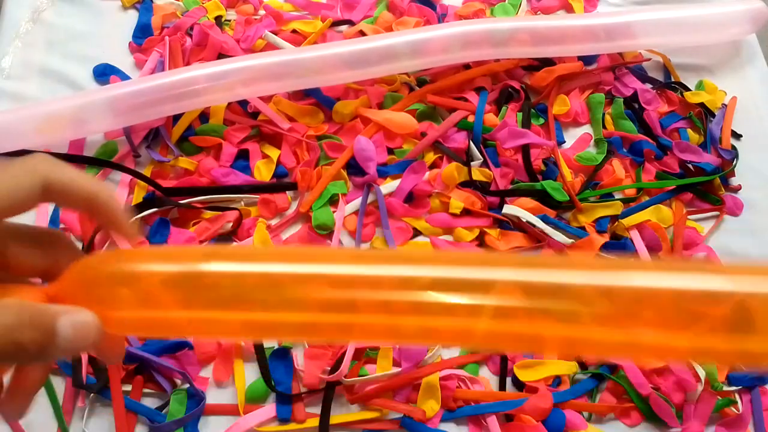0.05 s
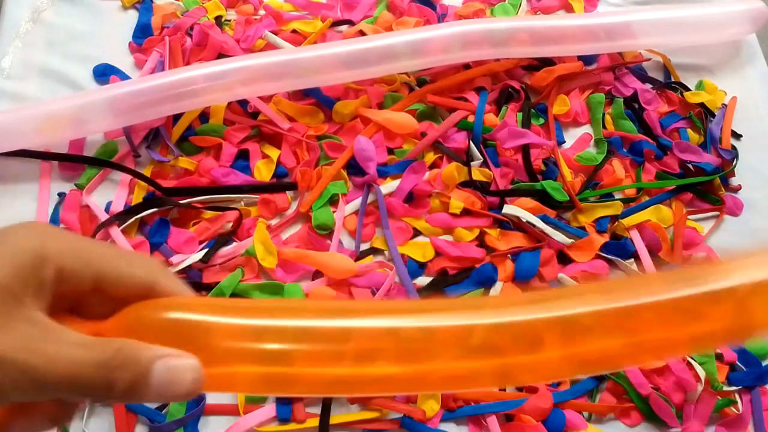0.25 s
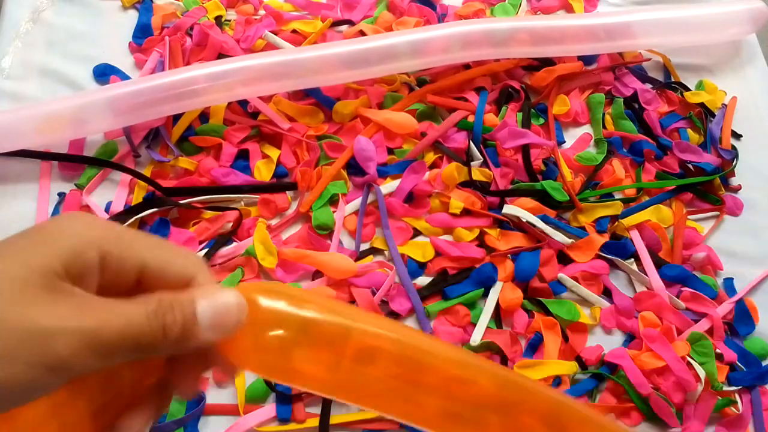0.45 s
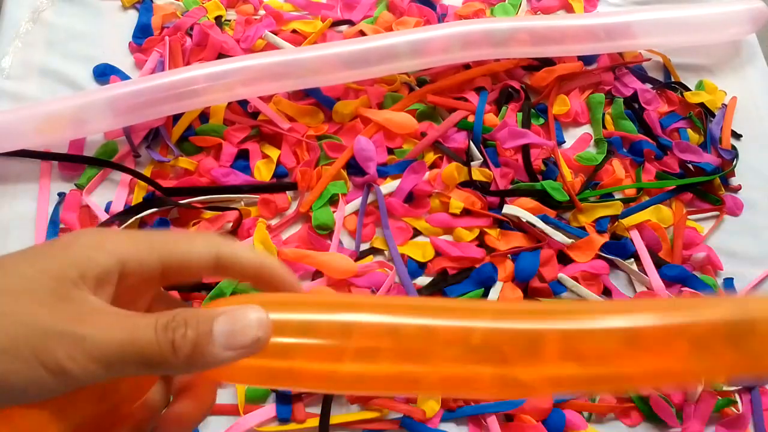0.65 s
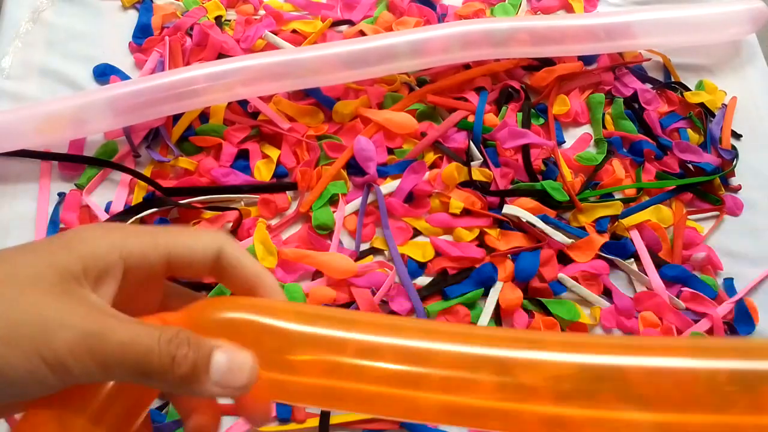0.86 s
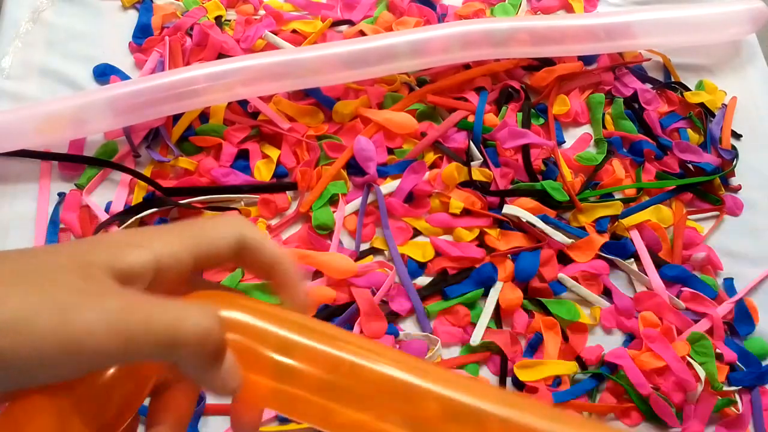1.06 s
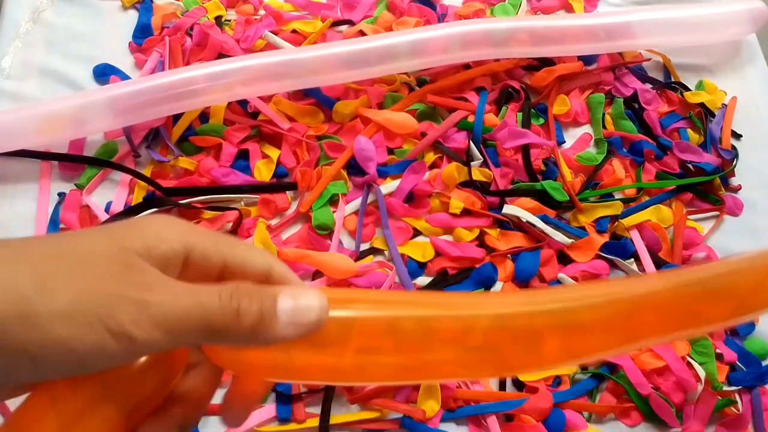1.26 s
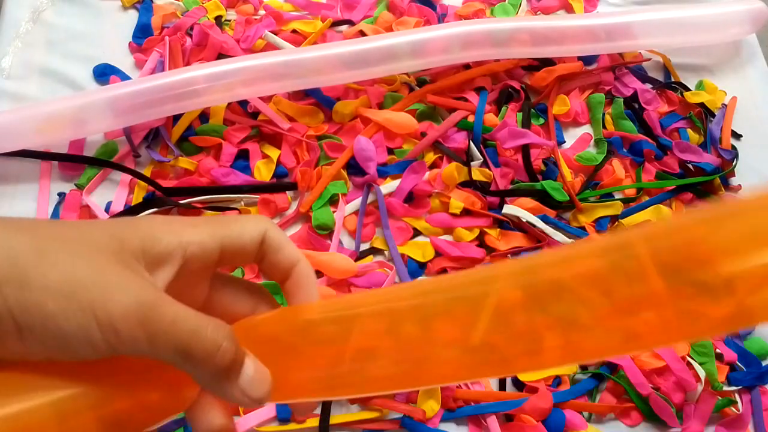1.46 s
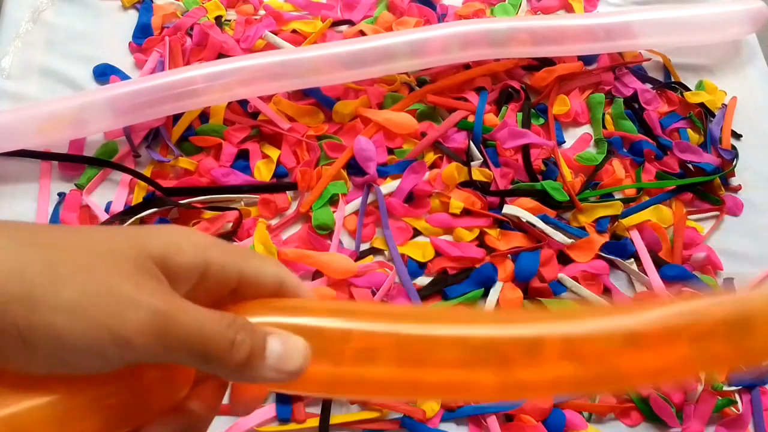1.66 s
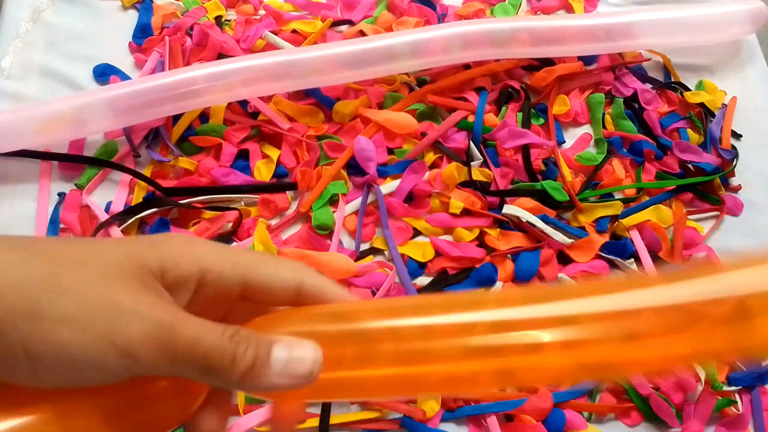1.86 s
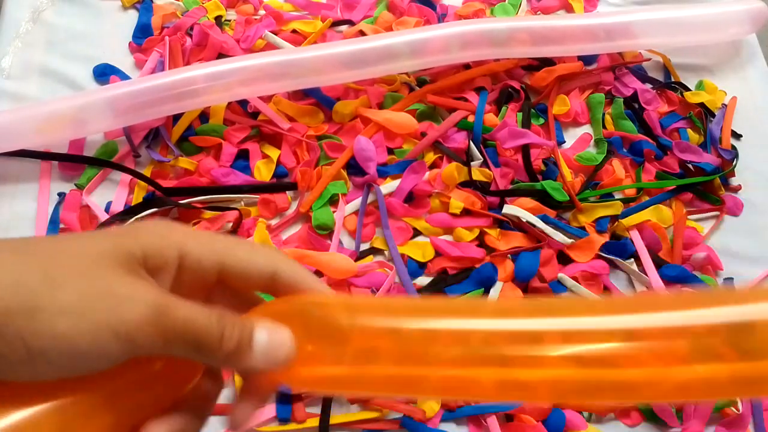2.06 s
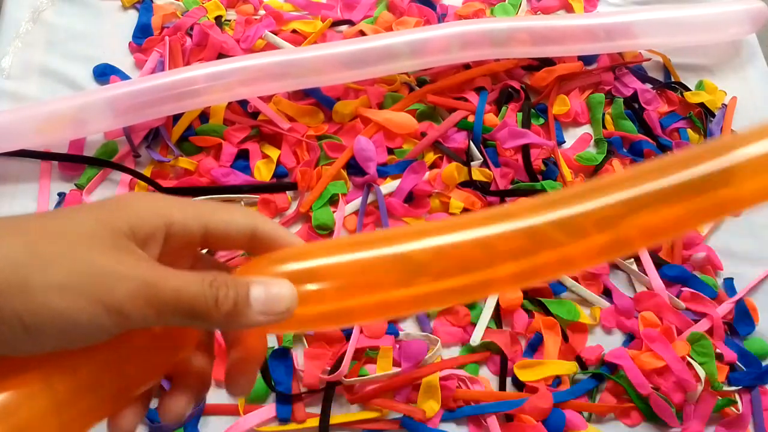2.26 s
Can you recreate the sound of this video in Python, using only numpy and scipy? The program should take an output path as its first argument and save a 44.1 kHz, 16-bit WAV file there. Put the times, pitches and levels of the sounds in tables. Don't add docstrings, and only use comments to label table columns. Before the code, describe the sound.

Fingers rub a long inflated balloon, giving shrill swooping squeals, scratchy creaks and dry snapping clicks.

```python
import sys
import numpy as np
from scipy import signal
from scipy.fft import rfft, irfft, next_fast_len
from scipy.io import wavfile
from scipy.ndimage import uniform_filter1d

SR = 44100
rng = np.random.default_rng(int(sys.argv[2]) if len(sys.argv) > 2 else 0)


def dump_mix(stems):
    frames = np.atleast_2d(stems).T
    limited = np.clip(frames, -1, 1)
    pcm = np.round(limited * 32767).astype(np.int16)
    wavfile.write(sys.argv[1], SR, pcm)


def rack_gain(trim_db):
    fader = np.asarray(trim_db, float)
    return 10 ** (fader / 20)


N = 101429


def curve(points, hz):
    p = np.array(points)
    return np.interp(np.log(hz + 1), np.log(p[:, 0]), p[:, 1])


def colour(x, points):
    size = 4096
    half = size // 2
    response = rack_gain(curve(points, np.arange(half + 1) * SR / size))
    cepstrum = irfft(np.log(response))
    cepstrum[1:half] *= 2
    cepstrum[half + 1:] = 0
    impulse = irfft(np.exp(rfft(cepstrum)))[:half]
    return signal.fftconvolve(x, impulse)[:N]


def highpass(x, order, hz):
    return signal.sosfilt(signal.butter(order, hz, "high", fs=SR, output="sos"), x)


def drift(rate):
    settle = 4000
    r = np.exp(-2 * np.pi * rate / SR)
    x = signal.lfilter([1], [1, -2 * r, r * r], rng.standard_normal(N + settle))[settle:]
    return x / x.std()


def window(start, length, attack, release):
    t = np.arange(N) / SR - start
    return np.clip(t / attack, 0, 1) * np.exp(-np.clip(t - length, 0, None) / release)


# frequency in Hz, level in dB.
FLOOR = [(25, -26.5), (150, -45), (600, -26.5), (1600, -27.5), (3800, -21), (5500, -25.5), (7000, -42),
         (15500, -43)]
FLOOR_DB, HUSH_DUCK = -67.5, 14


def hush(squeals):
    noise = colour(rng.standard_normal(N), FLOOR)
    loudness = uniform_filter1d(np.abs(squeals), size=2000)
    return rack_gain(FLOOR_DB) * noise / noise.std() / (1 + HUSH_DUCK * loudness)


def rumble():
    x = signal.lfilter(*signal.iirpeak(100, 100 / 20, SR), rng.standard_normal(N))
    return rack_gain(-95) * x / x.std()


# start in seconds, length in seconds, slips per second, level in dB, skin level in dB.
TOUCHES = [
    (.001, 0.065, 2500, -29, -15),
    (.0432, 0.014, 6000, -23, 12.5),
    (.085, 0.016, 1500, -19.5, 4.5),
    (.124, 0.0041, 3200, -22.5, -27),
    (.14, 0.0096, 960, -18, 10.5),
    (.178, 0.016, 2800, -24.5, 12.5),
    (.23, 0.082, 1800, -19.5, 8),
]
# start in seconds, length in seconds, slips per second, level in dB, skin level in dB.
RUBS = [(.28, 0.038, 1500, -20.5, -11), (.445, .015, 1800, -21.5, -4.5), (.456, 0.048, 4200, -23.5, -0.5),
        (0.496, 0.08, 400, -26.5, 3.5), (0.62, 0.011, 2300, -31, 7), (.642, 0.015, 2800, -23.5, 3.5),
        (.78, 0.034, 1200, -16, -3.5), (.994, 0.037, 4100, -19, 0.5), (1.028, 0.033, 1500, -18, -2.5),
        (1.06, 0.045, 1800, -30, 7.5), (1.111, 0.011, 1400, -15, 6), (1.124, 0.069, 1000, -29.5, -15.5),
        (1.303, 0.0081, 4800, -25, -1), (1.335, 0.035, 2100, -19.5, -0.5), (1.387, 0.025, 2300, -28, 2.5),
        (1.429, 0.056, 11000, -30.5, 6), (1.462, 0.04, 4900, -20, -11), (1.509, 0.04, 5600, -24.5, -0.5),
        (1.56, 0.05, 2400, -36.5, 13), (1.755, 0.11, 1100, -20.5, -6.5), (1.922, 0.0093, 2100, -21, -12.5),
        (1.937, 0.005, 2500, -24.5, 11.5), (1.974, 0.054, 4000, -37.5, 16.5), (2.03, 0.026, 3000, -24, -9),
        (2.212, 0.024, 1300, -24, -4.5)]
# frequency in Hz, level in dB.
TOUCH = [(1500, -34), (2600, -24), (3100, 4), (3420, -6.5), (3750, 7), (4300, -13.5), (4800, -41),
         (16000, -58)]
# frequency in Hz, level in dB.
TOUCH_SKIN = [(200, -60.5), (280, -42.5), (600, -51), (1050, -24.5), (1500, -46), (2100, -18),
              (2500, -43.5), (4000, -76)]
# frequency in Hz, level in dB.
SLIP = [(1200, -27), (2000, -31), (2800, -10.5), (3800, 6.5), (5200, -7), (5900, -16.5), (6800, -48.5),
        (16000, -62)]
# frequency in Hz, level in dB.
SKIN = [(200, -48.5), (450, -12), (750, -13), (1000, -8), (1350, -11), (2300, -1), (3300, -1.5),
        (6000, -90)]
SLIP_SPREAD_DB, RUB_LUMPS_DB = 5.5, 2.5
RUB_ATTACK_S, RUB_RELEASE_S = 0.002, 0.0054
SKIN_SHARE = 0.14


def rubs(table, contact, body):
    sharp, skin = np.zeros(N), np.zeros(N)
    chance = rng.random((2, N))
    lumps = rack_gain(RUB_LUMPS_DB * np.array([drift(85), drift(53)]))
    excess = np.minimum(rng.exponential(1, (2, N)), 2.5)
    sizes = rack_gain(SLIP_SPREAD_DB * excess) * rng.choice([-1, 1], (2, N)) * lumps
    for start, length, rate, db, skin_db in table:
        envelope = rack_gain(db) * window(start, length, RUB_ATTACK_S, RUB_RELEASE_S)
        rub = sizes * (chance < rate / SR) * envelope
        sharp += rub[0]
        skin += (SKIN_SHARE * rub[0] + rub[1]) * rack_gain(skin_db)
    return colour(sharp, contact) + colour(skin, body)


# frequency in Hz, level in dB.
AIR = [(5500, -99.5), (6300, -29.5), (8000, -40.5), (12000, -47), (16000, -45)]
# start in seconds, length in seconds, extra gain.
WIPE = (1.428, .068, 2.5)


def friction_hiss(contact):
    strength = uniform_filter1d(np.abs(contact), size=40)
    hiss = colour(strength * rng.standard_normal(N), AIR)
    start, length, extra = WIPE
    return hiss * (1 + extra * window(start, length, .005, .01))


EARLY_T60_S, EARLY_DB = 0.07, -9.5
ROOM_T60_S, ROOM_DB = 0.35, -5.5


def room(x):
    t = np.arange(SR // 2) / SR
    tail = 0
    for t60, db in ((EARLY_T60_S, EARLY_DB), (ROOM_T60_S, ROOM_DB)):
        part = rng.standard_normal(len(t)) * rack_gain(-60 * t / t60) * (t > .001)
        tail = tail + rack_gain(db) * part / np.sqrt(np.sum(part ** 2))
    return signal.fftconvolve(x, tail)[:N]


# time in seconds, frequency in Hz.
TAUT = [(0, 4550), (.235, 4850), (.27, 6200), (.5, 5900), (.6, 5560), (.645, 6370), (.93, 6040),
        (1.2, 5470), (1.3, 4970), (1.5, 5100), (1.6, 5940), (1.68, 4930), (1.72, 4580), (1.76, 4880),
        (1.83, 6600), (2.05, 6000), (2.15, 4900), (2.3, 4670)]
# centre in Hz, width in Hz, depth from 0 to 1.
HOLLOWS = [
    (850, 150, .7),
    (1407, 300, 1),
]
EDGE_HZ, LEAK_DB = 200, -37
REGRIP_S = 1.0


def taut(x):
    size = 2 * next_fast_len(N // 2 + SR // 20)
    t = np.arange(N) / SR
    hz = np.arange(size // 2 + 1) * SR / size
    spectrum = rfft(x, size)
    edge = np.interp(t, *np.transpose(TAUT))
    out, below = 0, 0
    for top in np.append(np.arange(4200, 7000, 200), 2 * SR):
        lowpass = 1 / (1 + np.exp(np.clip((hz - top) / 60, -50, 50)))
        upto = irfft(spectrum * lowpass)[:N]
        carried = 1 / (1 + np.exp(np.clip((top - edge) / EDGE_HZ, -50, 50)))
        out = out + (upto - below) * (rack_gain(LEAK_DB) + carried)
        below = upto
    first_grip = np.clip((REGRIP_S - t) / 0.019, 0, 1)
    for centre_hz, width_hz, depth in HOLLOWS:
        peak = signal.lfilter(*signal.iirpeak(centre_hz, centre_hz / width_hz, SR), out)
        out = out - depth * first_grip * peak
    return out


# time in seconds, peak level in dB.
SNAPS = [(0.087, -22), (1.3567, -14), (1.3672, -21), (1.371, -20), (1.3954, -23), (1.4004, -22),
         (1.4082, -28), (1.5157, -19), (1.532, -15), (1.5419, -21), (1.5507, -21), (1.5641, -13),
         (1.5736, -23), (1.5758, -10), (1.5856, -8), (1.5929, -22), (1.6015, -9), (1.6158, -25),
         (1.6361, -28), (1.6629, -30), (1.6797, -25), (1.7025, -30), (1.7136, -29), (1.7154, -40),
         (1.7258, -22), (1.7285, -27), (1.7351, -17), (1.7373, -18), (1.7419, -17), (1.7443, -16),
         (1.7489, -15), (1.7509, -15), (1.7711, -24), (2.1838, -37), (2.1871, -36), (2.1898, -34),
         (2.1927, -38), (2.1965, -36), (2.204, -40), (2.2123, -35), (2.2142, -26), (2.2224, -28),
         (2.2258, -28), (2.2295, -27), (2.2412, -30), (2.2445, -34), (2.2472, -28), (2.2558, -24),
         (2.2581, -32)]
# time in seconds, peak level in dB.
TICKS = [(0.6441, -14), (0.9047, -12), (0.9466, -19), (0.9535, -22), (0.9583, -16), (0.9604, -24),
         (0.966, -15), (0.9719, -17), (0.9771, -13), (0.9801, -14), (0.9823, -17), (0.9849, -15),
         (0.9871, -16), (0.9895, -16), (0.9917, -16), (0.9934, -15), (1.0557, -14), (1.0593, -16),
         (1.0623, -15), (1.0663, -16), (1.0681, -15), (1.0708, -17), (1.0743, -15), (1.0783, -18),
         (1.0822, -17), (1.0861, -16), (1.0897, -16), (1.1005, -22), (1.1055, -22), (1.114, -17),
         (1.1178, -14), (1.1203, -16), (1.1223, -14), (1.1283, -20), (1.1533, -14), (1.1569, -12),
         (1.1606, -11), (1.164, -12), (1.1666, -12), (1.1697, -12), (1.1728, -13), (1.1757, -17),
         (1.1783, -19), (1.1811, -23)]
# start in seconds, number of slips, first gap in seconds, gap ratio per slip, level in dB.
CREAKS = [
    (1.0327, 10, 0.0026, 1, -15),
]
# time in seconds, level in dB.
GRIP = [(0.95, -7.5), (1.001, -5.5), (1.101, -11.5), (1.55, -7), (1.62, -15), (1.691, 4), (1.76, 3),
        (2.2, -3)]
SNAP_DB, CREAK_DB = 19, 18.5
CREAK_JITTER, CREAK_SPREAD_DB = .06, 2.2
DULLING = .2
CLICK_RING_S, CLICK_RING_DB = .007, -10


def slips():
    clicks = np.zeros(N)
    for start, count, gap, change, db in CREAKS:
        k = np.arange(count)
        timing, strength = rng.standard_normal((2, count))
        gaps = gap * change ** k * (1 + CREAK_JITTER * timing)
        s = start + np.cumsum(gaps) - gap
        clicks[(s * SR).astype(int)] += rack_gain(db + CREAK_DB + CREAK_SPREAD_DB * strength)
    for s, db in list(TICKS) + list(SNAPS):
        clicks[int((s - .0004) * SR)] += rack_gain(db + SNAP_DB)
    grip_db = np.interp(np.arange(N) / SR, *np.transpose(GRIP))
    sharp = colour(clicks * rack_gain(DULLING * (grip_db.min() - grip_db)), SLIP)
    skin = colour(clicks * rack_gain(grip_db), SKIN)
    t = np.arange(SR // 20) / SR
    ring = rng.standard_normal(len(t)) * rack_gain(-60 * t / CLICK_RING_S)
    ring = rack_gain(CLICK_RING_DB) * ring / np.sqrt(np.sum(ring ** 2))
    ring[0] = 1
    return highpass(signal.fftconvolve(sharp + skin, ring)[:N], 2, 700)


# time in seconds, pitch in Hz, level in dB.
SQUEALS = [
    [(.234, 3707, -28), (.258, 4093, -33.5), (.275, 5830, -32.5), (.292, 3496, -25), (.318, 4530, -34.5),
     (.342, 3492, -27), (.37, 5212, -25.5), (.393, 3500, -25.5), (.405, 5150, -38)],
    [(.41, 5525, -55.5), (.45, 4890, -31.5)],
    [(.597, 3690, -42), (.628, 3915, -27), (.645, 5816, -27.5), (.668, 4700, -16.5), (.687, 3508, -30.5),
     (.72, 3568, -27.5), (.752, 5496, -16), (.768, 3613, -25), (.79, 3295, -43)],
    [(.795, 3534, -35), (.82, 3685, -25), (.842, 5383, -23), (.86, 3645, -36.5), (.885, 4725, -44),
     (.925, 3974, -43)],
    [(1.792, 3631, -31), (1.807, 3800, -25), (1.828, 6150, -43), (1.852, 4870, -18.5), (1.87, 3597, -31.5),
     (1.908, 3330, -32), (1.925, 4933, -16), (1.942, 5334, -29), (1.958, 3530, -26)],
    [(1.96, 3622, -25), (1.975, 5290, -36.5), (1.995, 3645, -41.5), (2.015, 5220, -44.5),
     (2.045, 3700, -48.5)],
]
# time in seconds, pitch in Hz, level in dB.
TURN = [
    (.458, 3900, -10.5),
    (.48, 2720, -30.5),
    (.494, 4090, -48.5),
]
# frequency in Hz, level in dB.
MIC = [(1500, -24), (2500, -3), (3700, -2), (4200, -5.5), (5000, -12), (5700, -16), (6400, -13)]
# frequency in Hz, level in dB.
GRIT = [(250, -38), (600, -10), (1100, -14.5), (1450, -92.5), (2300, -31.5), (3000, -39.5), (6500, -69)]
WOBBLE_HZ, WOBBLE_RATE_HZ = 60, 300
FLUTTER_DB, FLUTTER_RATE_HZ = 3, 400
SQUEAL_EDGE_S, SQUEAL_GRIT_DB = 0.008, -18
SECOND_FINGER_S, SECOND_FINGER_DB, SECOND_FINGER_PITCH = .023, -3, 1.04


def squeal(strokes):
    out, grit_gain = np.zeros(N), np.zeros(N)
    fingers = ((0, 0, 1), (SECOND_FINGER_S, SECOND_FINGER_DB, SECOND_FINGER_PITCH))
    for lag, finger_db, pitch in fingers:
        t = np.arange(N) / SR - lag
        wobble = 2 * WOBBLE_HZ * np.tanh(.5 * drift(WOBBLE_RATE_HZ))
        flutter = rack_gain(finger_db + 2 * FLUTTER_DB * np.tanh(.5 * drift(FLUTTER_RATE_HZ)))
        for rows in strokes:
            s, hz, db = np.transpose(rows)
            glide = uniform_filter1d(np.interp(t, s, pitch * hz), size=250)
            phase = 2 * np.pi * np.cumsum(glide + wobble) / SR
            envelope = window(s[0] + lag, s[-1] - s[0], SQUEAL_EDGE_S, SQUEAL_EDGE_S)
            gain = flutter * rack_gain(np.interp(t, s, db)) * envelope
            out += gain * np.sin(phase)
            grit_gain += gain
    grit = colour(grit_gain * rng.standard_normal(N), GRIT)
    return colour(out, MIC) + rack_gain(SQUEAL_GRIT_DB) * grit


def overtones(squeals):
    bent = squeals * np.abs(squeals) ** .5 + squeals ** 2
    return rack_gain(-17) * highpass(bent, 8, 9000)


# start in seconds, length in seconds, frequency in Hz, level in
# dB.
HUMS = [(0.283, 0.028, 235, -61), (1.015, 0.012, 1010, -41), (1.111, 0.0037, 955, -33.5),
        (1.161, 0.048, 355.4, -54), (0.464, 0.026, 982, -48), (0.507, .02, 467.5, -56.5),
        (1.343, 0.02, 1140, -51.5), (1.235, 0.09, 676, -61), (1.341, 0.038, 526.3, -44),
        (1.466, 0.02, 1029, -36), (2.069, 0.063, 1630, -55)]


def hums():
    bend = 1 + 0.012 * drift(40)
    flutter = rack_gain(2.0 * drift(43))
    out = np.zeros(N)
    for start, length, hz, db in HUMS:
        tone = np.sin(2 * np.pi * np.cumsum(hz * bend) / SR)
        out += rack_gain(db) * window(start, length, 0.0027, 0.0097) * tone
    return out * flutter


CLICK_WET_DB, SQUEAL_WET_DB = -4, 11.5
LOW_CUT_HZ = 327


def scene():
    rub = rubs(TOUCHES, TOUCH, TOUCH_SKIN) + rubs(RUBS, SLIP, SKIN) + squeal([TURN])
    clicks = slips()
    high = squeal(SQUEALS)
    reflected = room(rub + rack_gain(CLICK_WET_DB) * clicks + rack_gain(SQUEAL_WET_DB) * high)
    near = taut(rub + high + clicks + reflected)
    near = near + friction_hiss(rub + clicks) + overtones(high)
    near = highpass(near, 4, LOW_CUT_HZ)
    return (near + hums() + hush(high) + rumble())[None]


def top_cut(x):
    return signal.sosfilt(signal.butter(12, 15800, fs=SR, output="sos"), x)


def record(dry):
    return top_cut(dry)


dry = scene()
out = record(dry)
dump_mix(out)
```